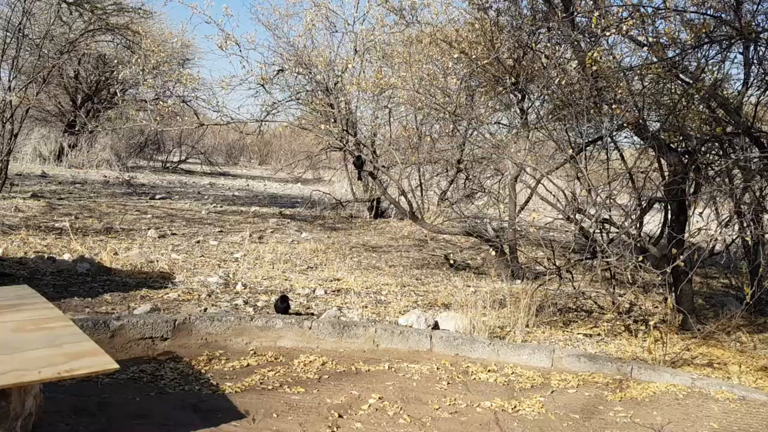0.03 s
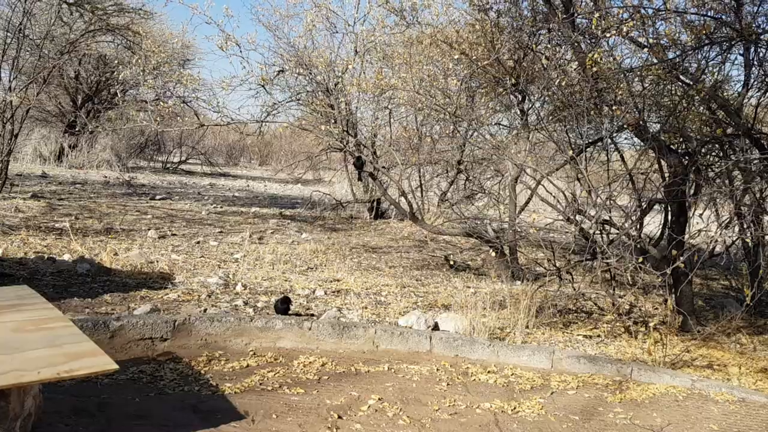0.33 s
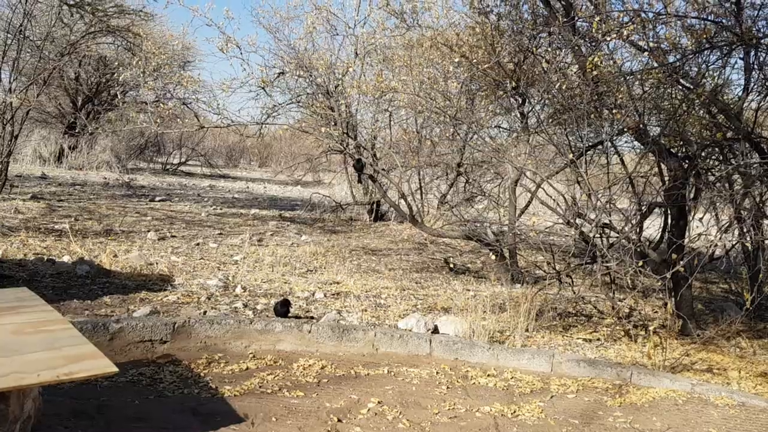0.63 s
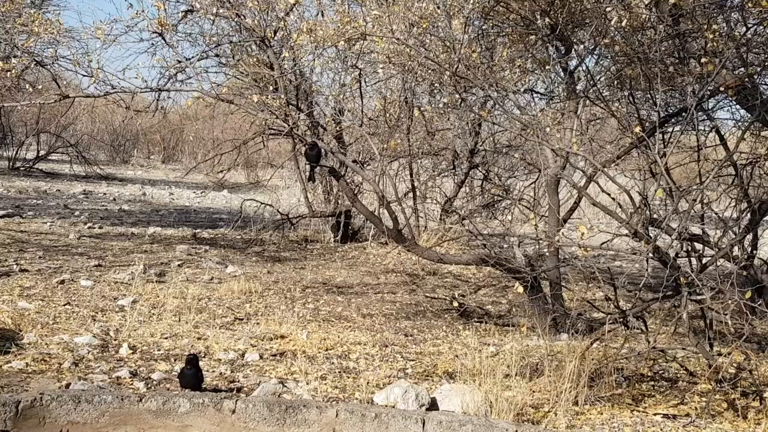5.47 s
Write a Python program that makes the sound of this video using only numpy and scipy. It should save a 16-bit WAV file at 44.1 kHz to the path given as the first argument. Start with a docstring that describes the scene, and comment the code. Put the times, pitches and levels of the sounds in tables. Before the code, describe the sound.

A bird gives short metallic chips and one rasping, whistling phrase in dry scrub, over low wind buffeting the microphone.

```python
"""Wind buffets two microphone ports and pops in the right one, over a faint hiss, dry leaves and a low drone.
A drongo calls from dry scrub: arched metallic chips, then a squeak, a buzzing rasp and a nasal whistle
that ends in a tick. Twigs snap softly before that phrase, and one far call answers it.
The wind is eddy noise swollen by gusts. Each call is the pulsing syrinx, coloured by throat and bill,
and the bushes scatter a short tail back."""
import sys
import numpy as np
from scipy import signal
from scipy.fft import rfft, irfft
from scipy.io import wavfile
from scipy.ndimage import uniform_filter1d

SR = 44100
rng = np.random.default_rng(int(sys.argv[2]) if len(sys.argv) > 2 else 0)


def dump(signal):
    """Clip the signal to [-1, 1] and save it as 16-bit WAV at the path in sys.argv[1]."""
    limited = np.clip(np.atleast_2d(signal).T, -1, 1)
    pcm = np.round(limited * 32767).astype(np.int16)
    wavfile.write(sys.argv[1], SR, pcm)


N = 356945
TIME = np.arange(N) / SR
BINS = np.fft.rfftfreq(N, 1 / SR)

# the breeze on the ports: time_s, rumble_db
BREEZE_LEVEL = [(0, -50.5), (1.75, -49.5), (2.2, -51.5), (3.7, -48.5), (4.1, -52), (5.2, -50), (5.5, -52),
                (6.4, -51.5), (8.1, -50.5)]
# gusts striking the ports: time_s, length_s, rumble_db, flutter_vs_rumble_db, left_minus_right_db
PORT_GUSTS = [(0.127, 0.04, -32, -15.5, -11), (.25, .1, -33.5, -16, 10), (0.418, 0.056, -29, -8.5, 6),
              (0.563, .07, -29.5, -11.5, -10), (0.732, 0.13, -38, -32, 7), (0.89, 0.07, -40, -10, -22),
              (1.053, 0.12, -42.5, -29, -26), (1.23, 0.052, -38.5, -16.5, 10), (1.402, .1, -32.5, -17, 5),
              (1.558, 0.072, -34, -37, -8), (1.826, 0.26, -43, -20, -6), (2.72, 0.059, -46.5, -23, 8),
              (3.016, 0.076, -42, -12.5, 7), (3.39, 0.083, -43.5, -22, 17), (3.528, 0.1, -45, -29, -16),
              (4.758, .08, -48.5, -24, -13)]
# level rides for the distant drone, the leaves and the thin whistling hiss: time_s, level_db
DRONE_LEVEL = [(0, -79), (3.8, -74), (4.6, -68.5), (5.6, -75.5), (6.5, -75.5), (7.3, -63.5), (8.1, -67)]
LEAF_LEVEL = [(0, -100), (.65, -73), (2.5, -99), (3.7, -79.5), (4, -69.5), (4.6, -74), (5.3, -62),
              (5.8, -84.5), (6.5, -81), (8.1, -112)]
THIN_LEVEL = [(.11, -67), (.38, -67.5), (.5, -78), (2.43, -74)]
# tone colour of each noise layer: frequency_hz, relative_db
RUMBLE_EQ = [(20, -22.5), (32, -9.5), (45, -1), (59, 4), (72, 2.5), (85, -3), (110, -2.5), (150, -18),
             (220, -31)]
FLUTTER_EQ = [(90, -13), (135, 7), (185, -1.5), (280, -11.5), (400, -28.5), (600, -40.5)]
DRONE_EQ = [(110, -15.5), (160, 1), (220, 2), (275, 2), (340, -7.5), (480, -39)]
HISS_EQ = [(260, -19), (450, -1.5), (794, -8), (868, -7.5), (1070, -8.5), (2870, -12), (3640, -13.5),
           (4700, -16), (6240, -17.5), (7580, -23.5), (12000, -4), (15100, -5), (16000, -5.5)]
LEAF_EQ = [(300, 8), (600, 6), (900, 3), (1500, 3), (3500, -4), (4400, 2.5), (5100, 5.5), (6500, 2.5),
           (8300, 3), (10000, 1.5), (12500, 4.5), (16000, -34)]
THIN_EQ = [(700, -17), (950, -7.5), (1300, -17.5), (2600, -15.5), (3050, -5.5), (3600, -18), (4500, -20),
           (5300, -13), (6100, -8.5), (6700, -1), (7200, -10.5), (8000, -25.5), (16000, -43)]
TWIG_EQ = [(3500, -16), (5000, -1), (8500, 8), (11000, 1)]
# pops of air in the right port: start_s, level_db, push_s
AIR_POPS = [(0.415, -9.5, 0.0029), (0.622, -32.5, 0.00036), (0.668, -36, 0.0011)]
# metallic chips: start_s, length_s, top_pitch_hz, level_db, bright_db, extra_bright_at_feet_db, rough_rad
CHIP_NOTES = [(1.016, 0.068, 2910, -44.3, -1, 7, 0.51), (3.859, .065, 2734, -44.5, 11.5, -14, 0.31),
              (5.021, .063, 2392, -49, 13.5, -5, 0.77), (7.121, 0.066, 2516, -49, 9.5, 0.5, .9)]
# squeak, rasp, whistle, tick and far answer: start_s, length_s, pitch_hz, level_db, bright_db,
# attack_s, release_s, swell_db, scoop_share, settle_s, bend_share
HELD_NOTES = [(4.999, 0.05, 711, -39, 3, 0.029, 0.0091, 2, -0.8, 0.0088, -0.016),
              (5.062, 0.2307, 559.8, -43, 7, 0.0092, 0.0098, 8, .3, 0.0046, -0.043),
              (5.422, .208, 1326, -42.5, -1.5, 0.0067, 0.002, 2.5, .11, .005, 0.44),
              (5.6455, 0.0081, 856, -37.5, -1, 0.0036, 0.0026, 9, 0.03, 0.0034, -0.018),
              (6.605, .055, 1210, -69.5, -18, 0.026, .025, 0, .05, 0.011, -0.23)]
# resonances of throat and bill for each kind of note: centre_hz, width_hz, gain_db
CHIP_FORMANTS = [(2860, 1860, 4), (5460, 1140, -2.5), (7540, 2100, -27), (10300, 1700, -68)]
SQUEAK_FORMANTS = [(2070, 370, -1), (2675, 460, -3), (8950, 2500, -40), (13400, 1100, -22.5)]
RASP_FORMANTS = [(1718, 64, 5), (2090, 385, 10), (2790, 69, 1), (3360, 160, -8), (4200, 790, -21),
                 (6220, 400, -29.5), (8810, 560, -17), (10600, 1000, -25.5), (12240, 950, -18.5),
                 (13700, 1300, -37), (14900, 870, -24)]
WHISTLE_FORMANTS = [(1460, 920, 3), (2690, 170, -6), (5320, 490, -22.5), (6400, 1500, -21.5),
                    (8800, 990, -13), (10500, 1200, -18), (12340, 1200, -19), (15400, 2400, -23)]
# the bird's balance between the ports: frequency_hz, left_minus_right_db
BIRD_PAN = [(1330, -3.5), (1700, 7.5), (2230, 1), (2450, 17), (2750, 5.5), (3360, -4), (4700, 11),
            (5450, 2.5), (5850, -1), (7200, -1), (8300, 10), (12000, 10.5), (15000, 9)]
# its phase between the ports: frequency_hz, left_lead_rad
BIRD_LEAD = [(1330, 1.33), (1700, 3.3), (2080, 1.72), (2250, 2.96), (2480, 0.64), (2750, 1.34),
             (3360, 2.42), (4900, 1.78), (5500, 1.88), (7200, 1.87), (9000, 0.92), (15000, 1.8)]
# how long the scrub rings: frequency_hz, t60_s
SCRUB_DECAY = [(1000, .45), (2700, .28), (5000, .22), (12000, .17)]
# dry twigs snapping: start_s, level_db
TWIG_SNAPS = [(4.074, -64), (4.14, -55), (4.208, -65)]

WIND_START_S, WIND_RISE_S = .103, .0074
BREEZE_FLUTTER_DB, BREEZE_SWAY_DB = -11, 1.74  # flutter against rumble; random rise and fall
FLUTTER_SPREAD, FLUTTER_LEAN_DB = .6, -3  # a gust's flutter pans less than its rumble, and leans right
HISS_DB, HISS_RISE_S = -70.5, .00089
THIN_STOP_S, THIN_TICK_DB, THIN_TICK_S = 2.432, 14.5, .0041
PORT_HZ, PORT_DB, PORT_T60_S = 2370, -30, .0053  # the port's cavity rings after a pop
CHIP_DROP, CHIP_ARCH, CHIP_SKEW = .24, 2.9, 1.03  # pitch share lost at the feet; squareness; late top
CHIP_ATTACK_S, CHIP_RELEASE_S, CHIP_SWELL_DB = .019, .013, 9.5
SAG_PER_S, BEND_S = .044, .014  # share a held pitch sinks each second; time constant of its last bend
STRAIN_DB, BREAK_JITTER = 21, .063  # brighter while the pitch settles; the voice breaks up as it bends
ONSET_JITTER, ONSET_SHIMMER, ONSET_ROUGH_S = .013, .13, .062  # pitch and level start rough, then clear
EDGE_HZ = 15850  # top of the band


def gain_of(db):
    """Decibels to amplitude."""
    return 10 ** (np.asarray(db) / 20)


def unit_rms(x):
    """Scales to rms 1."""
    return x / np.sqrt(np.mean(x ** 2) + 1e-20)


def at_hz(points, hz):
    """Reads a curve on a log-frequency axis."""
    f, value = np.transpose(points)
    return np.interp(np.log(hz + 1), np.log(f + 1), value)


def ride_db(points):
    """Draws a level ride across the whole scene."""
    return np.interp(TIME, *np.transpose(points))


def panned(balance_db):
    """Constant-power left and right gains for a curve of left minus right dB."""
    ports = gain_of(np.outer([.5, -.5], balance_db))
    return ports / np.sqrt(np.mean(ports ** 2, axis=0))


def add(mix, start_s, sound):
    """Drops a stereo sound into the mix."""
    part = mix[:, round(start_s * SR):][:, :sound.shape[1]]
    part += sound[:, :part.shape[1]]


def noise(eq):
    """Separate noise of rms 1 for each port, rolled off steeply beyond the ends of the EQ."""
    low_cut = 1 / (1 + (eq[0][0] / 1.5 / (BINS + 1)) ** 6)
    high_cut = 1 / (1 + (BINS / 1.5 / eq[-1][0]) ** 6)
    white = rfft(rng.standard_normal((2, N)))
    return unit_rms(irfft(white * gain_of(at_hz(eq, BINS)) * low_cut * high_cut, N))


def wobble(t, rate_hz, size=8192):
    """A smooth random modulator of rms about 1."""
    slow = unit_rms(signal.lfilter(np.hanning(9), [1], rng.standard_normal(size)))
    return np.interp((t - t[0]) * rate_hz * 6 + 10, np.arange(size), slow)


def eddies(eq):
    """Turbulence, levelled so that the slow swells are left to the gusts."""
    churn = noise(eq)
    return churn / np.sqrt(uniform_filter1d(churn ** 2, size=5000, axis=1) + 1e-9)


def wind():
    """Each port has its own eddies; bell-shaped gusts add rumble and a higher flutter to the breeze."""
    rumble_power = gain_of(ride_db(BREEZE_LEVEL) + BREEZE_SWAY_DB * wobble(TIME, rate_hz=5.5)) ** 2
    flutter_power = rumble_power * gain_of(BREEZE_FLUTTER_DB) ** 2
    for peak_s, length, db, flutter_db, pan_db in PORT_GUSTS:
        gust = gain_of(db) ** 2 * np.exp2(-(2 * (TIME - peak_s) / length) ** 2)
        flutter_pan = panned([FLUTTER_SPREAD * pan_db + FLUTTER_LEAN_DB])
        rumble_power = rumble_power + gust * panned([pan_db]) ** 2
        flutter_power = flutter_power + gust * (gain_of(flutter_db) * flutter_pan) ** 2
    return np.sqrt(rumble_power) * eddies(RUMBLE_EQ) + np.sqrt(flutter_power) * eddies(FLUTTER_EQ)


def drone():
    """A distant band of low noise that slowly swells and ebbs."""
    return gain_of(ride_db(DRONE_LEVEL)) * noise(DRONE_EQ)


def air_hiss():
    """The steady noise bed of air and microphone."""
    return gain_of(HISS_DB) * noise(HISS_EQ)


def thin_hiss():
    """A thin whistling hiss on the right that swells into a tick and stops."""
    tick = gain_of(THIN_TICK_DB) * np.exp(-2 * abs(TIME - THIN_STOP_S) / THIN_TICK_S)
    level = gain_of(ride_db(THIN_LEVEL)) * ((TIME < THIN_STOP_S) + tick)
    return level * noise(THIN_EQ) * gain_of([[-32], [0]])


def leaves():
    """Dry leaves stir in slow, lightly trembling swells of noise."""
    stirring_db = .9 * wobble(TIME, rate_hz=20)
    return gain_of(ride_db(LEAF_LEVEL) + stirring_db) * noise(LEAF_EQ)


def pops(fizz_db, fizz_t60_s, left_db):
    """A sharp push of air with its slower suction, a brief ring of the port and a short fizz."""
    out, t = np.zeros((2, N)), np.arange(SR // 10) / SR
    ring = gain_of(PORT_DB - 60 * t / PORT_T60_S) * np.sin(2 * np.pi * PORT_HZ * t)
    attack = 1 - np.exp(-(t / .00054) ** 2)
    for start, db, push_s in AIR_POPS:
        push = (1 - t / push_s) * np.exp(-t / push_s) * attack
        fizz = gain_of(fizz_db - 60 * t / fizz_t60_s) * rng.standard_normal((2, len(t)))
        add(out, start, gain_of(db) * (push - ring + fizz) * gain_of([[left_db], [0]]))
    return out


def envelope(t, attack, release, swell_db):
    """A note opens, swells and closes."""
    opening = np.sin(np.pi / 2 * np.clip(t / attack, 0, 1)) ** 2
    closing = np.sin(np.pi / 2 * np.clip((t[-1] - t) / release, 0, 1)) ** 2
    return opening * closing * gain_of(swell_db * (t / t[-1] - 1))


def syrinx(t, hz, effort, bright_db, formants, jitter, shimmer, fading_db, rough):
    """The syrinx pulses at a gliding, slightly unsteady rate; the throat weights each harmonic."""
    cycle_rad = 2 * np.pi * np.cumsum(hz * (1 + jitter * wobble(t, rate_hz=650))) / SR
    out = np.zeros((2, len(t)))
    for k in range(1, int(EDGE_HZ / hz.min()) + 1):
        f = k * hz
        peaks = [gain_of(db) / (1 + (2 * (f - centre) / width) ** 2) for centre, width, db in formants]
        level = np.linalg.norm(peaks, axis=0) * (f < EDGE_HZ)
        level *= gain_of(bright_db * at_hz([(3000, .24), (3800, .81)], f))  # brightness is a high shelf
        level /= 1 + (850 / f) ** 8  # a small bill radiates almost no bass
        treble = np.minimum(f / 8000, 1)
        # beamed overtones fade as the head turns
        level *= gain_of(fading_db * treble * wobble(t, rate_hz=33.7))
        smear = rough * treble ** 3 * wobble(t, rate_hz=850)  # the top harmonics are the least steady
        phase = k * cycle_rad + smear + rng.uniform(0, 2 * np.pi)
        port_phase = np.outer([.5, -.5], at_hz(BIRD_LEAD, f))
        out += level * panned(at_hz(BIRD_PAN, f)) * np.cos(phase + port_phase)
    return np.sqrt(2) * out * effort * (1 + shimmer * wobble(t, rate_hz=440))


def chips():
    """Each chip is a bright, metallic note with a strong octave overtone, arching up and down."""
    out = np.zeros((2, N))
    for start, length, top_hz, level_db, bright_db, feet_db, rough in CHIP_NOTES:
        t = np.arange(0, length, 1 / SR)
        foot = abs(2 * (t / length) ** CHIP_SKEW - 1) ** CHIP_ARCH  # 1 at either end, 0 at the top
        hz = top_hz * (1 - CHIP_DROP * foot)
        effort = gain_of(level_db) * envelope(t, CHIP_ATTACK_S, CHIP_RELEASE_S, CHIP_SWELL_DB)
        chip = syrinx(t, hz, effort, bright_db + feet_db * foot, CHIP_FORMANTS,
                      jitter=.0006, shimmer=.015, fading_db=2, rough=rough)
        add(out, start, chip)
    return out


def scrub(dry, wet_db, predelay_s=.004, near_boost=5, near_decay_s=.018):
    """Twigs and trunks scatter sparse echoes whose treble dies first; the nearest are strongest."""
    delay = TIME[:SR // 2]
    taps = rng.standard_normal((2, len(delay)))
    taps *= rng.random(taps.shape) < 2500 / SR  # about 2500 echoes a second
    taps *= (delay > predelay_s) * (1 + near_boost * np.exp(-delay / near_decay_s))
    hz, t, bands = signal.stft(taps, SR, nperseg=256)
    decay = gain_of(-60 * t / at_hz(SCRUB_DECAY, hz)[:, None])
    tail = signal.istft(bands * decay, SR, nperseg=256)[1]
    tail /= np.linalg.norm(tail, axis=1, keepdims=True)
    return gain_of(wet_db) * signal.fftconvolve(dry[:1], tail, axes=1)[:, :N]


def twigs(t60_s):
    """Each twig snaps with a burst of bright noise a few milliseconds long."""
    bursts = sum(gain_of(db - 60 * np.maximum(TIME - start, 0) / t60_s) * (TIME >= start)
                 for start, db in TWIG_SNAPS)
    return bursts * noise(TWIG_EQ)


def held_note(mix, note, formants, jitter, waver, shimmer, fading_db, rough):
    """Mixes in a note that scoops onto a wavering, slowly sagging pitch and bends away at the end."""
    start, length, hold_hz, level_db, bright_db, attack, release, swell_db, scoop, settle_s, bend = note
    t = np.arange(0, length, 1 / SR)
    settling, bending = np.exp(-t / settle_s), np.exp((t - length) / BEND_S)
    glide = scoop * settling + bend * bending - SAG_PER_S * (t - length / 2)
    hz = hold_hz * (1 + glide + waver * wobble(t, rate_hz=29))
    effort = gain_of(level_db) * envelope(t, attack, release, swell_db)
    onset = np.exp(-t / ONSET_ROUGH_S)
    jitter = jitter + ONSET_JITTER * onset + BREAK_JITTER * bending
    shimmer = shimmer + ONSET_SHIMMER * onset
    bright_db = bright_db + STRAIN_DB * settling
    add(mix, start, syrinx(t, hz, effort, bright_db, formants, jitter, shimmer, fading_db, rough))


def phrase():
    """A rough squeak, the rasp, the whistle and its closing tick; then one far answer."""
    squeak, rasp, whistle, tick, answer = HELD_NOTES
    out = np.zeros((2, N))
    held_note(out, squeak, SQUEAK_FORMANTS, jitter=.002, waver=.003, shimmer=.1, fading_db=2, rough=.8)
    held_note(out, rasp, RASP_FORMANTS, jitter=.0015, waver=.0015, shimmer=.08, fading_db=2.5, rough=.2)
    held_note(out, whistle, WHISTLE_FORMANTS,
              jitter=.0015, waver=.004, shimmer=.02, fading_db=2.5, rough=.3)
    held_note(out, tick, SQUEAK_FORMANTS, jitter=.03, waver=.003, shimmer=.4, fading_db=3, rough=1.5)
    held_note(out, answer, WHISTLE_FORMANTS, jitter=.02, waver=.003, shimmer=.4, fading_db=1.5, rough=.4)
    return out


def scene():
    """The bird and its echoes over a bed of wind and hiss, dotted with pops and twigs."""
    calls, song = chips(), phrase()
    echoes = scrub(calls, wet_db=-14.5) + scrub(song, wet_db=-19)
    since_wind = TIME - WIND_START_S
    low_bed = (wind() + drone()) * np.clip(since_wind / WIND_RISE_S, 0, 1)
    port_pops = pops(fizz_db=-40, fizz_t60_s=.069, left_db=-21)
    high_bed = (air_hiss() + leaves() + thin_hiss()) * np.clip(since_wind / HISS_RISE_S, .05, 1)
    return calls + song + echoes + low_bed + port_pops + high_bed + twigs(t60_s=.0092)


def record(dry):
    """The recorder's band limit: a steep low-pass on the whole mix."""
    low_pass = signal.firwin(511, EDGE_HZ, window=("kaiser", 9), fs=SR)
    return signal.oaconvolve(dry, low_pass[None], "same")


dry = scene()
out = record(dry)
dump(out)
```